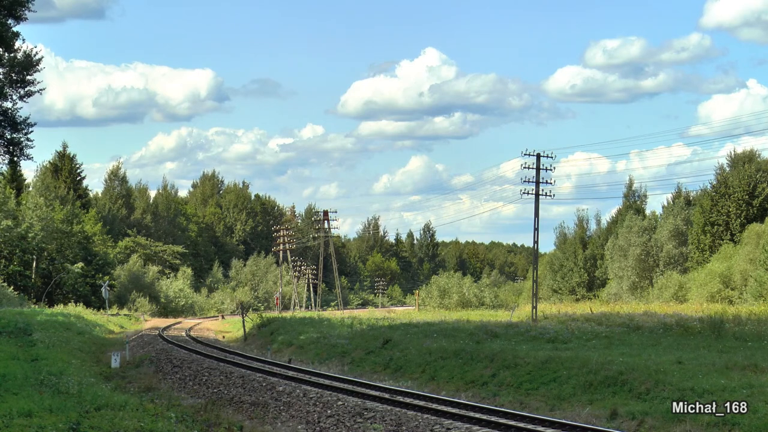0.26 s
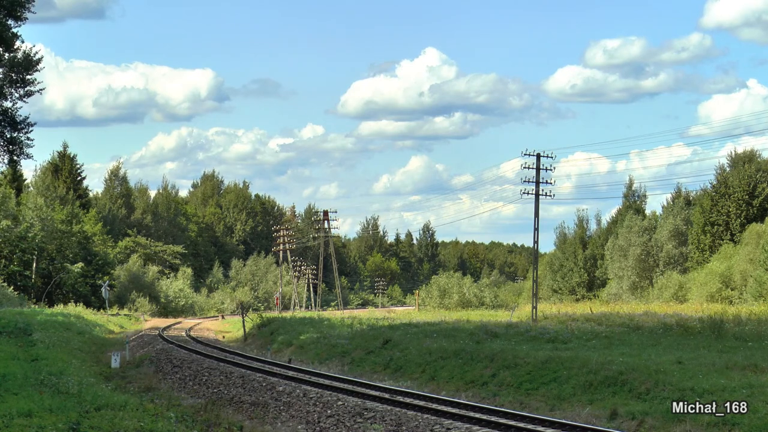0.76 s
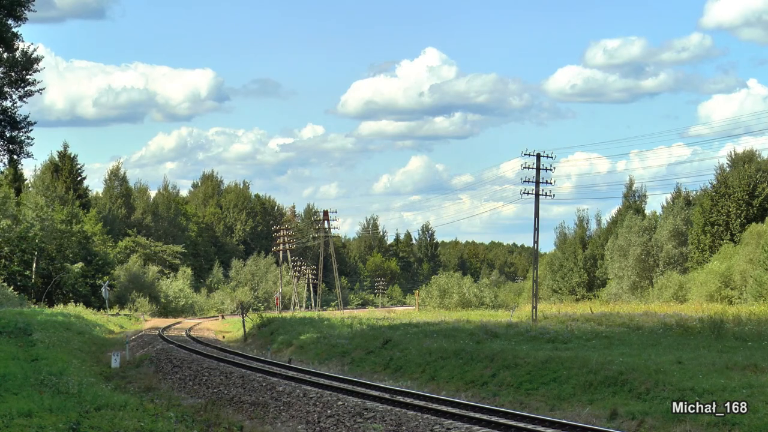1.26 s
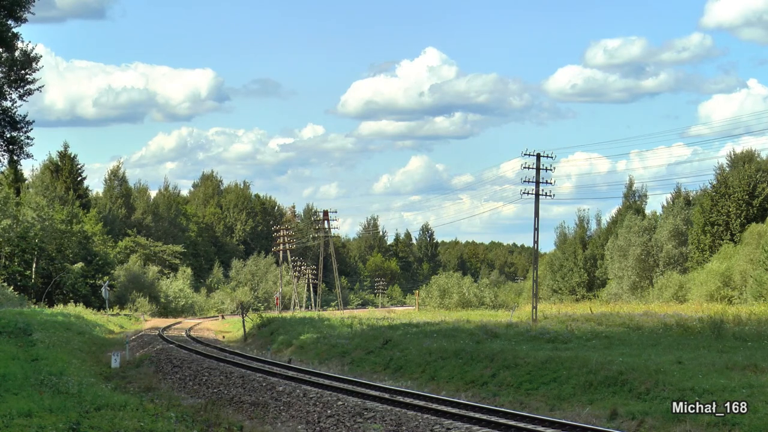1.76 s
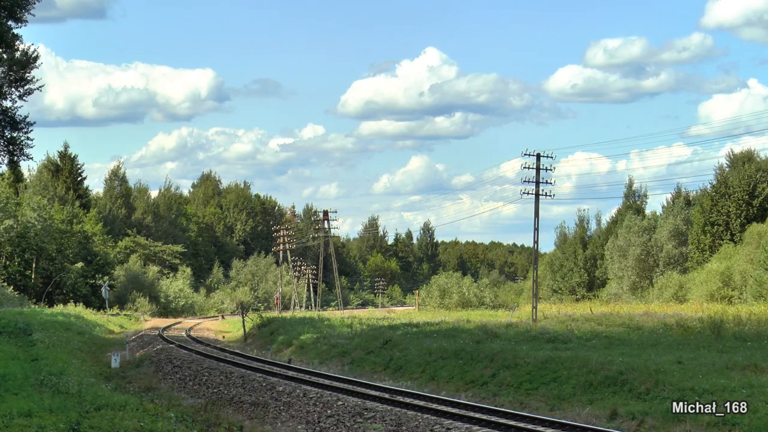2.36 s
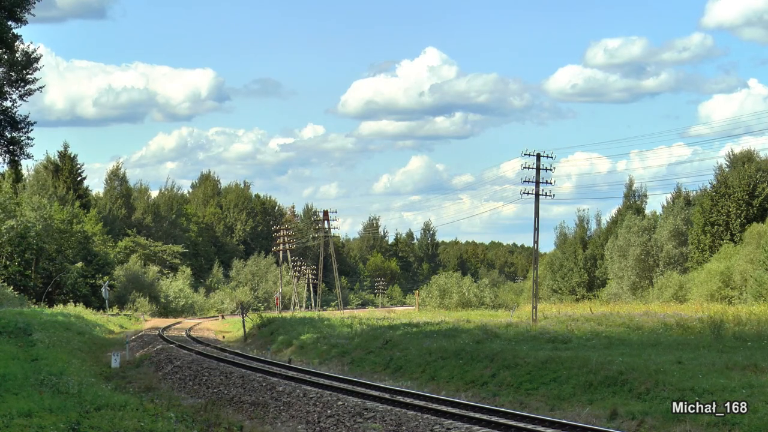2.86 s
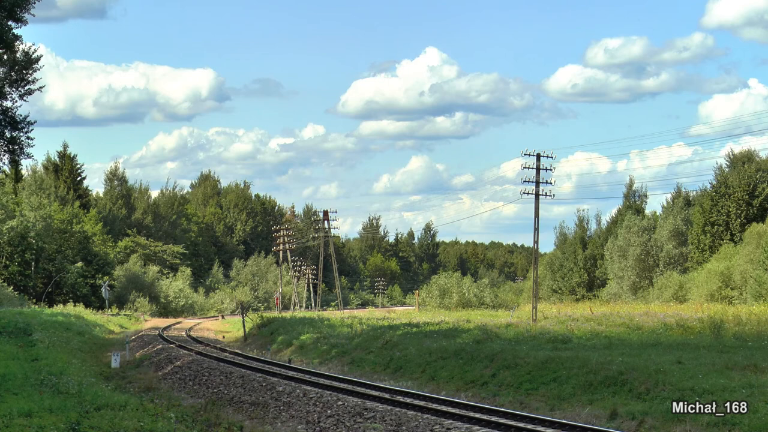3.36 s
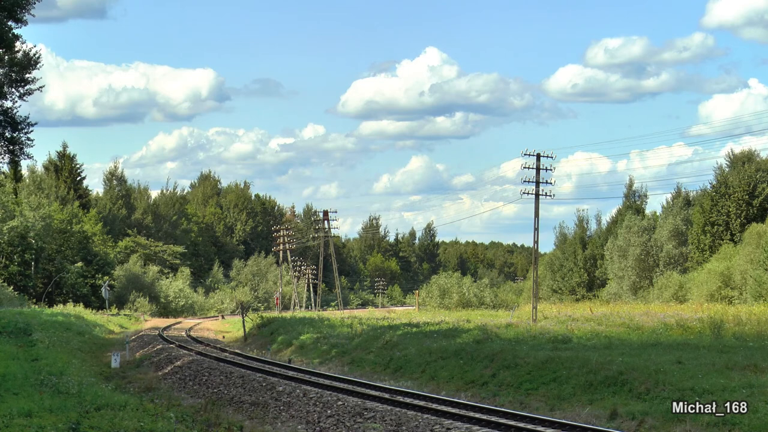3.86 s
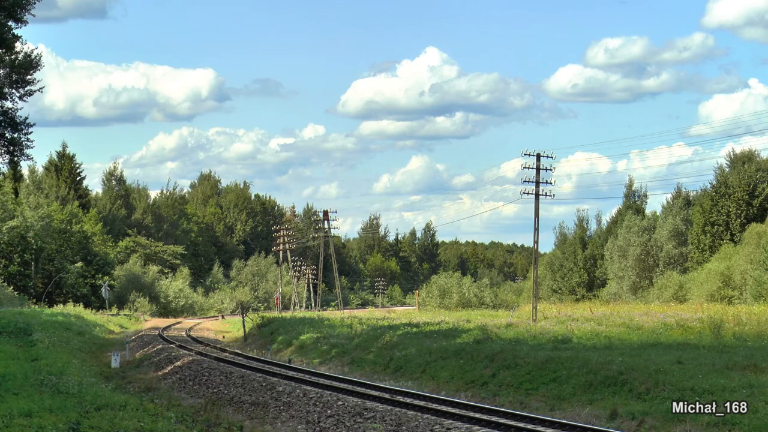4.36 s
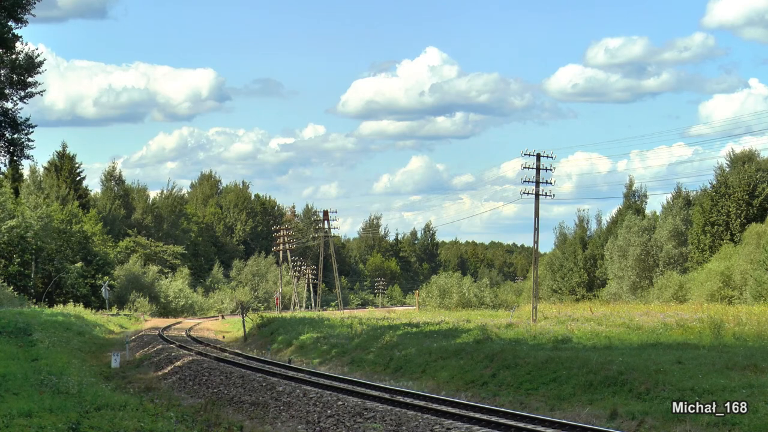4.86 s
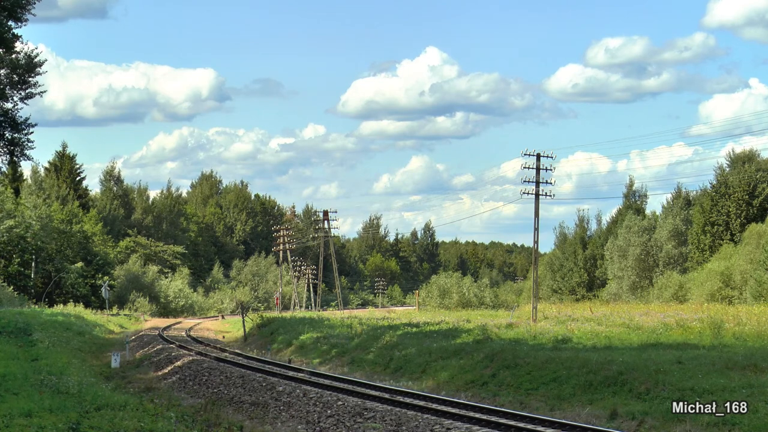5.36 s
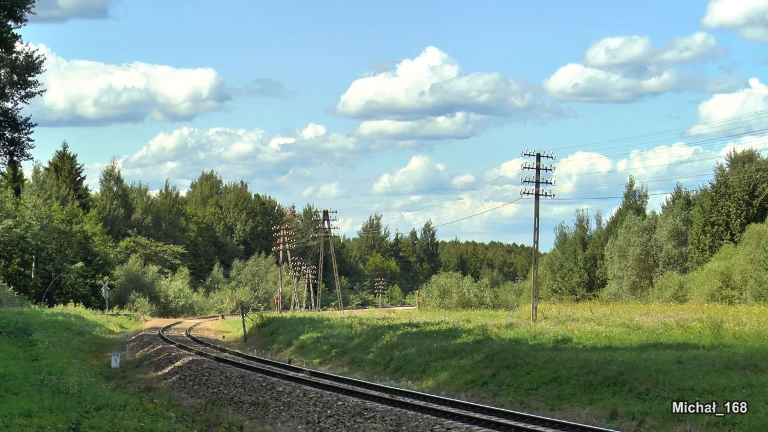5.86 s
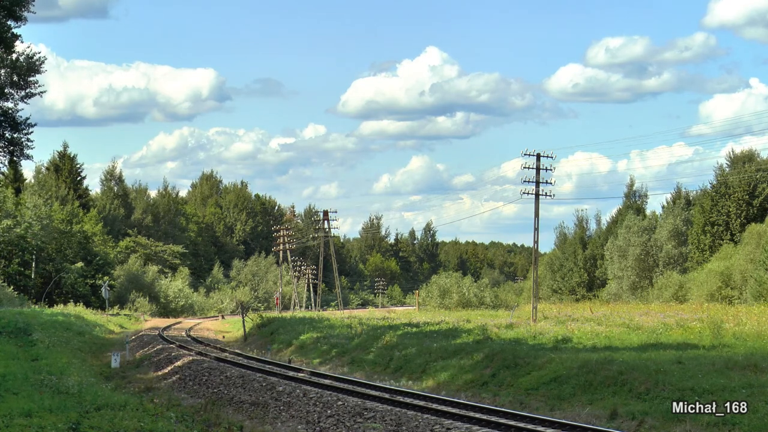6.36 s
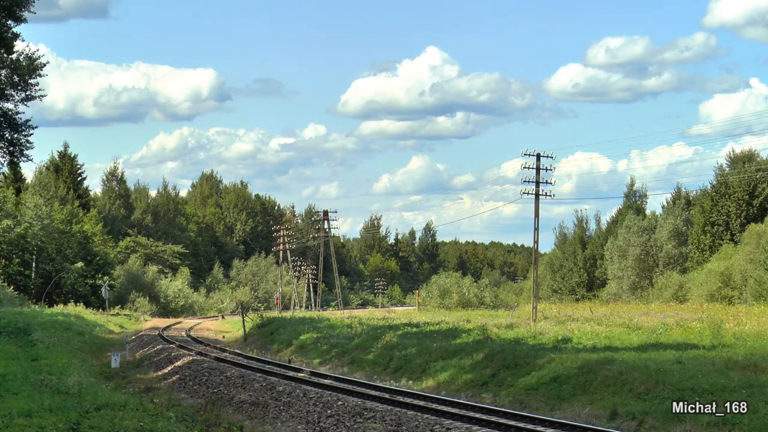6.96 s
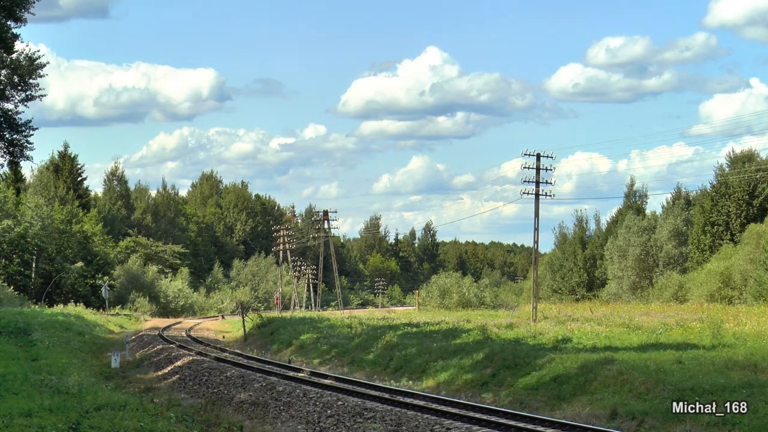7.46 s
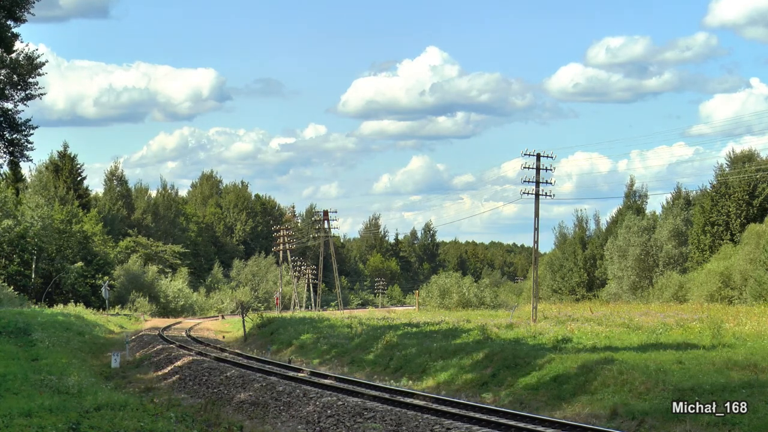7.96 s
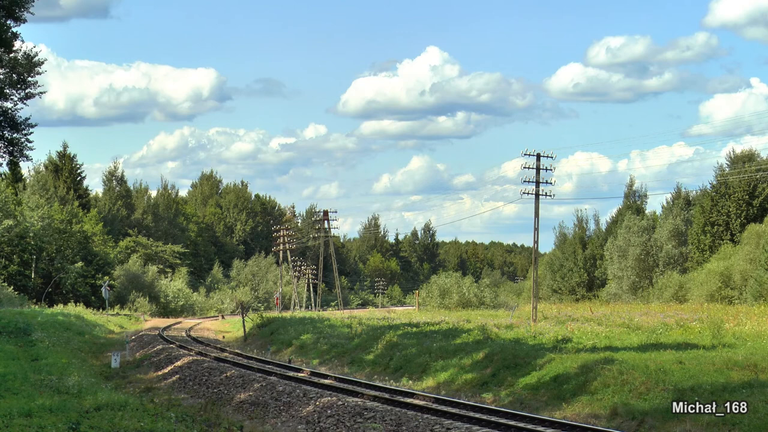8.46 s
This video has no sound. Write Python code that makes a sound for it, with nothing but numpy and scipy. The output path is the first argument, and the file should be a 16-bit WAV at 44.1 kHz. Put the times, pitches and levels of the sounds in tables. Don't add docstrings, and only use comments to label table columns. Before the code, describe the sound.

Outdoors in open country, a distant diesel freight train rolls on with a continuous low, hollow roar, fullest around three seconds, then slightly softer in its boom. Meadow bush crickets rasp in quick dry pulses on both sides over a far insect hiss. A nearer one starts after four seconds, grows louder and stops at about seven and a half. Soft wind bumps the stereo microphone.

```python
import sys
import numpy as np
from scipy import signal
from scipy.fft import rfft, irfft, next_fast_len
from scipy.io import wavfile

SR = 44100
rng = np.random.default_rng(int(sys.argv[2]) if len(sys.argv) > 2 else 0)


def magnitude_from_level(level_db):
    exponent = np.asarray(level_db, float) / 20
    return 10 ** exponent


def log_audio(samples):
    frames = np.atleast_2d(samples).T
    limited = np.clip(frames, -1, 1)
    pcm = np.round(limited * 32767).astype(np.int16)
    wavfile.write(sys.argv[1], SR, pcm)


N = 383669
TIME = np.arange(N) / SR
SIZE = next_fast_len(N)
HZ = np.maximum(np.arange(SIZE // 2 + 1) * SR / SIZE, 1)


def rms_one(x):
    return x / np.sqrt(np.mean(x ** 2) + 1e-20)


def in_time(rows):
    s, *columns = np.transpose(rows)
    return [np.interp(TIME, s, column) for column in columns]


def at_hz(points, hz):
    table_hz, value = np.array(points)[:, 0], np.array(points)[:, 1]
    return np.interp(np.log(hz), np.log(table_hz), value)


def drift(rate):
    step = 40
    r = np.exp(-2 * np.pi * rate * step / SR)
    settle = 2000
    noise = rng.standard_normal(N // step + 2 + settle)
    slow = signal.lfilter([1], [1, -2 * r, r * r], noise)[settle:]
    return np.interp(np.arange(N) / step, np.arange(len(slow)), rms_one(slow))


def coloured(spectrum, alike):
    mid, side = rfft(rng.standard_normal((2, SIZE))) * magnitude_from_level(at_hz(spectrum, HZ))
    alike = np.clip(alike, -1, 1)
    return np.sqrt(1 + alike) * mid + np.sqrt(1 - alike) * side * [[1], [-1]]


def place(x, pan_db, lag_s):
    late = irfft(rfft(x, SIZE) * np.exp(-2j * np.pi * HZ * lag_s), SIZE)[:N]
    return np.array([late * magnitude_from_level(pan_db / 2), x * magnitude_from_level(-pan_db / 2)])


def file_on_wing(modes, teeth_per_s, uneven_db):
    travel = np.cumsum(teeth_per_s / SR * rng.uniform(0, 2, N))
    passed = np.floor(travel + rng.uniform(-.6, .6, N))
    struck = np.flatnonzero(np.diff(np.maximum.accumulate(passed), prepend=0))
    out = np.zeros(N)
    for hz, width, db in modes:
        strength = magnitude_from_level(db + uneven_db * rng.standard_normal(N // 4))
        strength = strength * rng.choice([-1, 1], N // 4)
        clicks = np.full(N, 1e-18)
        clicks[struck] = strength[:len(struck)]
        r = np.exp(-np.pi * width / SR)
        poles = [1, -2 * r * np.cos(2 * np.pi * hz / SR), r * r]
        section = [(1 - r * r) / 2, 0, (r * r - 1) / 2] + poles
        out += signal.sosfilt([section, section], clicks)
    return rms_one(out)


def strokes(s, db, length_s, edge_s):
    out = np.zeros(N)
    for at, gain, length in np.broadcast(s, magnitude_from_level(np.asarray(db)), length_s):
        near = slice(max(int((at - length) * SR), 0), int((at + length) * SR))
        distance_s = np.abs(TIME[near] - at)
        out[near] += gain * np.clip((length / 2 - distance_s) / edge_s + .5, 0, 1)
    return out


# (time [s], girder boom [dB], nearness [dB])
TRAIN = [(0, -41, -3.5), (.6, -34, -5), (1.6, -33, -1), (2.4, -30.5, 0), (2.9, -29.5, 1), (3.5, -30.5, 0.5),
         (3.85, -30.5, 3), (4.1, -34, 2), (4.25, -31, 2.5), (4.8, -33, 2.5), (5.0, -34, 2), (6.1, -36, 1),
         (7.0, -34.5, .5), (7.6, -36, 2), (8.7, -35, 2)]
# (low edge [Hz], high edge [Hz])
TRAIN_BANDS = [(110, 200), (200, 480), (480, 900), (900, 3000)]
# (level [dB], share of the boom's swing [dB/dB], share of the nearness [dB/dB])
BAND_FOLLOWS = [(-52.5, -0.39, 0.71), (-33.5, 1.0, 0.025), (-44.5, 0.28, 1.18), (-52, 0.023, .6)]
# (frequency [Hz], spectral level [dB])
ROAR = [(29, -48), (50, -19.5), (84, -15), (123, -22.5), (216, -11.5), (349, 0.5), (426, -2.5),
        (521, -15.5), (612, -14), (793, -21.5), (1420, -30), (3100, -46), (6000, -53), (7800, -75),
        (13200, -120)]
# (frequency [Hz], coherence [1])
ROAR_ALIKE = [(60, 1), (130, 0.86), (300, 0.99), (640, 0.94), (1400, 0.92), (2200, 0.91), (3500, 0.63),
              (6000, 0.26)]
# (time [s], left minus right [dB])
ROAR_PAN = [(0.0, 2), (1.28, -1), (8.7, -0.5)]


def train_roar():
    mean_boom_db, flicker_db, flicker_rate_hz = -33, 0.43, 6.8
    noise = coloured(ROAR, at_hz(ROAR_ALIKE, HZ))
    boom_db, near_db = in_time(TRAIN)
    centres = np.log([np.sqrt(low * high) for low, high in TRAIN_BANDS])
    out = np.zeros((2, N))
    for k, (low, high) in enumerate(TRAIN_BANDS):
        base_db, by_boom, by_near = BAND_FOLLOWS[k]
        level_db = base_db + by_boom * (boom_db - mean_boom_db) + by_near * near_db
        level_db = level_db + flicker_db * drift(flicker_rate_hz)
        inside = irfft(noise * ((HZ > low) & (HZ < high)), SIZE)
        share = np.interp(np.log(HZ), centres, np.arange(len(centres)) == k)
        band = irfft(noise * share, SIZE)[:, :N]
        out += band * magnitude_from_level(level_db) / np.sqrt(np.mean(inside ** 2))
    pan_db = in_time(ROAR_PAN)[0]
    return out * magnitude_from_level(pan_db * [[.5], [-.5]] - 0.38)


# (multiple of the firing rate [1], level at start [dB], level at end [dB])
ORDERS_HEARD = [(5, -66, -66), (6, -62, -64), (9, -60, -61), (10, -68, -56), (12, -61, -58), (13, -61, -57)]
# (time [s], level [dB])
WHINE = [(0, -98), (4.5, -68.5), (5.5, -63), (6.3, -77), (7, -72.5), (8.1, -63), (8.7, -83)]


def engine():
    firing_hz, whine_hz = 15.75, 1427
    whine_db = in_time(WHINE)[0] + 1.2 * drift(0.7)
    out = magnitude_from_level(whine_db) * np.sin(2 * np.pi * whine_hz * TIME + 0.86 * drift(4.3))
    for multiple, start_db, end_db in ORDERS_HEARD:
        level_db = start_db + (end_db - start_db) * TIME / TIME[-1] + 0.59 * drift(0.22)
        phase = 2 * np.pi * multiple * firing_hz * TIME + 1.9 * drift(0.48)
        out += magnitude_from_level(level_db) * np.sin(phase)
    return np.sqrt(2) * out


# (time [s], wing strokes so far [1])
NEAR_COUNT = [(4.262, 0), (4.709, 16), (4.944, 24), (5.879, 53), (6.066, 59), (6.596, 77), (7.137, 95),
              (7.325, 101), (7.494, 106)]
# (time [s], level [dB])
NEAR_EFFORT = [(4.26, -53.5), (4.55, -45.5), (4.75, -45.5), (5.1, -45.5), (5.6, -43), (6.05, -42.5),
               (6.4, -40), (7.1, -37.5), (7.5, -38)]
# (frequency [Hz], bandwidth [Hz], level [dB])
NEAR_WING = [(5000, 2600, -28), (7150, 350, -10), (7680, 600, 0), (8200, 480, -2)]
# (frequency [Hz], bandwidth [Hz], level [dB])
NEAR_UPPER_WING = [(9500, 800, -2.5), (10900, 600, -14)]
# (frequency [Hz], bandwidth [Hz], level [dB])
NEAR_TOP = [(12600, 3500, -5), (14100, 900, -.5), (15200, 1100, -2)]
# (frequency [Hz], bandwidth [Hz], level [dB])
OPENING_WING = [(7800, 1000, 0), (8600, 900, -5), (9600, 1000, -1.5), (11000, 1200, -13),
                (14000, 5000, -16)]


def near_cricket():
    count_s, count = np.transpose(NEAR_COUNT)
    uneven_s, uneven_db = .0012, 1.2
    scatter = rng.standard_normal((int(count[-1]) + 1, 2))
    s = np.interp(np.arange(len(scatter)), count, count_s) + uneven_s * scatter[:, 0]
    db = np.interp(s, *np.transpose(NEAR_EFFORT)) + uneven_db * scatter[:, 1]

    closing = strokes(s, db + .5, length_s=.0102, edge_s=.0018)
    overtones = strokes(s, db - 15.0 + 0.16 * (db + 33), length_s=.011, edge_s=.0013)
    gaps = np.append(np.diff(s), .032)
    opening = strokes(s + gaps / 2, db - 13, length_s=gaps - .009, edge_s=.004)

    upper_db = -2.5 + 0.31 * (in_time(NEAR_EFFORT)[0] - np.max(db))
    wing = file_on_wing(NEAR_WING, teeth_per_s=2100, uneven_db=4.0)
    wing = wing + magnitude_from_level(upper_db) * file_on_wing(NEAR_UPPER_WING, teeth_per_s=2500, uneven_db=2.5)
    loud = place(closing * rms_one(wing), pan_db=0.0, lag_s=.00003)
    notch_hz, notch_width_hz = 8700, 400
    loud = signal.lfilter(*signal.iirnotch(notch_hz, notch_hz / notch_width_hz, fs=SR), loud)

    top_ring = file_on_wing(NEAR_TOP, teeth_per_s=2500, uneven_db=2.5)
    top = place(overtones * top_ring, pan_db=-6.5, lag_s=.00002)
    soft = [opening * file_on_wing(OPENING_WING, teeth_per_s=6000, uneven_db=2) * magnitude_from_level(port_db)
            for port_db in (2, -2.5)]
    return loud + top + soft


# (frequency [Hz], bandwidth [Hz], level [dB])
FAR_WING = [(7600, 1000, 3), (8300, 2400, 6), (9500, 1800, -7), (11300, 2500, -16)]


def left_cricket():
    start_s, period_s, slowing_s, count = .006, .0345, .00017, 24
    k = np.arange(count)
    s = start_s + period_s * k + slowing_s * k ** 2
    db = -54 + 2.5 * rng.standard_normal(count)
    song = strokes(s, db - 4.0, length_s=0.017, edge_s=.01)
    song = song * file_on_wing(FAR_WING, teeth_per_s=4000, uneven_db=-2)
    return place(song, pan_db=8.0, lag_s=-0.00002)


# (time [s], verses so far [1])
PAIR_COUNT = [(0, 0), (4.5, 65.79), (8.7, 126.82)]
# (middle [s], length [s], singer's level [dB], neighbour's answer [dB])
BOUTS = [(.4, 0.29, -60, -72), (0.865, 0.16, -51.5, -72), (1.425, 0.29, -53, -61), (1.85, .18, -60, -66),
         (2.45, 0.37, -59.5, -62), (2.985, .25, -58, -62), (3.37, 0.54, -55.5, -72),
         (3.9, 0.44, -56.5, -61), (4.306, 0.23, -53.5, -63), (6.0, 2.86, -52.5, -54.5),
         (7.873, 0.18, -58, -59), (8.2, 0.38, -63, -65), (8.6, 0.28, -59.5, -65)]
# (frequency [Hz], bandwidth [Hz], level [dB])
PAIR_WING = [(7440, 650, -22), (8340, 1400, 8), (9550, 1500, -4), (12100, 1900, -11)]


def pair_crickets():
    middle_s, length_s, pair_db, answer_db = np.transpose(BOUTS)
    idle = magnitude_from_level(-79.5)
    pair = idle + strokes(middle_s, pair_db, length_s, edge_s=0.19)
    answer = idle + strokes(middle_s, answer_db, length_s, edge_s=0.19)
    count_s, count = np.transpose(PAIR_COUNT)
    verses = np.arange(int(count[-1]) + 1)
    song = np.zeros(N)
    for phase, level in ((0, pair), (.3, pair), (.66, answer)):
        s = np.interp(verses + phase, count, count_s) + rng.normal(0, 0.00077, len(verses))
        song += level * strokes(s, rng.normal(0, 1.7, len(s)), length_s=0.0079, edge_s=0.0055)
    song = song * file_on_wing(PAIR_WING, teeth_per_s=3900, uneven_db=-3.0)
    return place(song, pan_db=-17, lag_s=.00003)


# (time [s], level [dB], length [s])
CHIRPS = [(.145, -63, 0.023), (.765, -62, .015), (.795, -57, .015), (1.142, -66, .03), (1.6, -64, .03),
          (2.88, -64, .04), (3.715, -62, .025), (3.745, -66, .025), (4.367, -64, .02), (7.875, -71, .015),
          (7.9, -58, .015), (8.13, -63, .012), (8.35, -56, .017), (8.379, -56, .02)]
# (frequency [Hz], bandwidth [Hz], level [dB])
CHIRP_WING = [(9500, 2500, -2), (11200, 3000, 0), (13200, 3500, -5), (15200, 2500, -10)]


def chirps():
    s, db, length_s = np.transpose(CHIRPS)
    rasp = strokes(s, db, length_s, edge_s=.004)
    rasp = rasp * file_on_wing(CHIRP_WING, teeth_per_s=5000, uneven_db=3)
    return place(rasp, pan_db=5, lag_s=-0.000013)


# (time [s], level [dB], frequency [Hz])
BIRD = [(.175, -71, 2800), (.232, -63, 2800), (.33, -73, 2800), (6.005, -58, 2850), (6.025, -69, 2450),
        (6.06, -61, 2700), (8.192, -60, 2920), (8.2, -57, 2360), (8.22, -63, 3000), (8.245, -62, 2700)]


def far_bird():
    out = np.zeros(N)
    for s, db, hz in BIRD:
        out += strokes([s], [db], length_s=.018, edge_s=.012) * np.sin(2 * np.pi * hz * TIME)
    return out


# (time [s], level [dB], left minus right [dB])
MEADOW = [(0, -60.5, 1), (.67, -58, 4), (1.03, -59.5, 1), (1.47, -59.5, 5), (1.7, -60, .5),
          (2.13, -57.5, -3), (2.4, -58, 0), (3.48, -56, 0), (3.9, -59, 3), (4.4, -57.5, 2), (7.55, -56, -1),
          (7.87, -61, 5), (8.7, -60, 2)]
# (time [s], level [dB])
SMALL_SINGERS = [(0, -69), (1.7, -67.5), (2.4, -65.5), (4.4, -66), (7.55, -68), (8.7, -69)]
# (frequency [Hz], spectral level [dB])
CHORUS = [(1470, -9), (2500, -5.5), (2850, -5), (3300, -8), (5670, -8), (6570, -4), (7550, 3.5), (9520, 3),
          (10900, -2.5), (15100, -12), (15900, -16)]


def chorus():
    main_db, pan_db = in_time(MEADOW)
    high_db, = in_time(SMALL_SINGERS)
    noise = coloured(CHORUS, 0.25)
    above_main = np.clip((HZ - 6300) / 600, 0, 1)
    above_high = np.clip((HZ - 9800) / 1400, 0, 1)
    shares = (1 - above_main, above_main - above_high, above_high)
    leaves, main, high = (rms_one(irfft(noise * share, SIZE)[:, :N]) for share in shares)
    throb_db = np.array([1.3 * drift(60) + .4 * drift(5.1) for side in range(2)])
    throb_db = throb_db + pan_db * [[.5], [-.5]]
    flicker_db = np.array([1.5 * drift(35) + .7 * drift(4) for side in range(2)])
    singers = magnitude_from_level(main_db + 0.5 + throb_db) * main + magnitude_from_level(high_db + 1.0 + flicker_db) * high
    return singers + magnitude_from_level(-65.5) * leaves


# (frequency [Hz], spectral level [dB])
BREEZE_COLOUR = [(8.8, -33), (15, 1), (38, 6), (75, 0), (111, -5.5), (161, -31), (200, -21), (260, -28),
                 (440, -120)]
# (middle [s], length [s], level over the calm air [dB])
GUSTS = [(0.748, 0.17, 7), (1.1, 0.52, 5), (1.43, 0.12, -4), (1.57, .1, 8), (1.9, 0.45, 4.5),
         (2.722, .15, 4.5), (3.0, .4, -4), (3.5, 0.2, 3), (4.89, 0.088, 6), (5.33, 0.084, 8),
         (5.82, 0.14, 4), (6.15, 0.25, 1), (7.102, 0.3, 6), (8.02, .15, -6)]


def breeze():
    air = rms_one(irfft(coloured(BREEZE_COLOUR, 0.5), SIZE)[:, :N])
    level_db = -47.5 - 0.55 * TIME
    for s, length_s, db in GUSTS:
        level_db = level_db + db * np.exp(-(2 * (TIME - s) / length_s) ** 2)
    port_db = 0.88 * np.array([drift(4.5), drift(4.1)]) + [[1.2], [-1.2]]
    return air * magnitude_from_level(level_db + port_db)


def scene():
    train = train_roar() + engine()
    insects = near_cricket() + left_cricket() + pair_crickets() + chirps() + chorus()
    return train + insects + far_bird() + breeze()


def top_cut(x):
    return signal.sosfilt(signal.butter(12, 15820, fs=SR, output="sos"), x)


def record(dry):
    return top_cut(dry)


dry = scene()
out = record(dry)
log_audio(out)
```